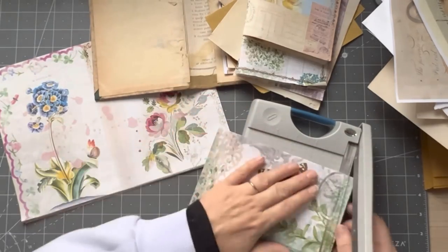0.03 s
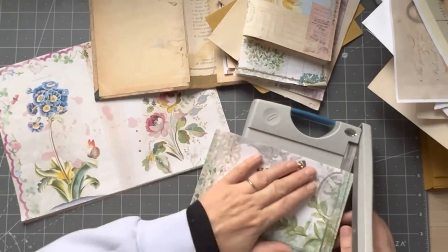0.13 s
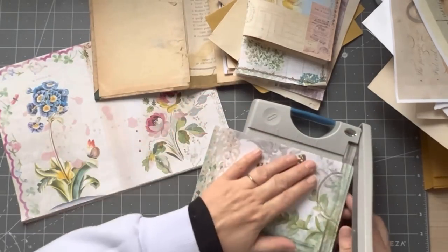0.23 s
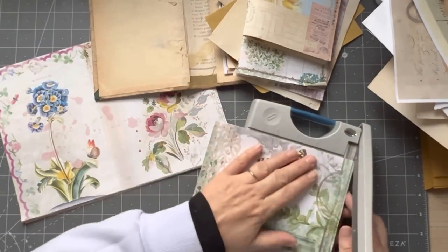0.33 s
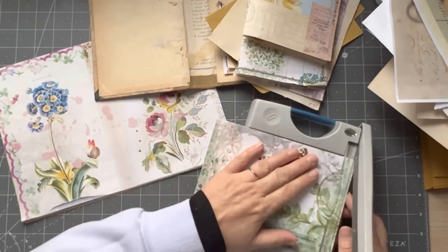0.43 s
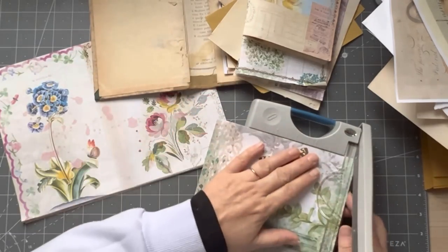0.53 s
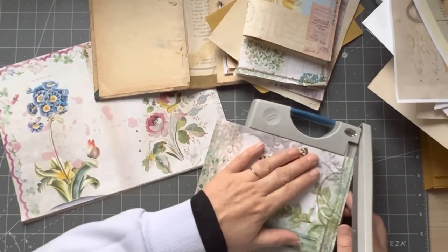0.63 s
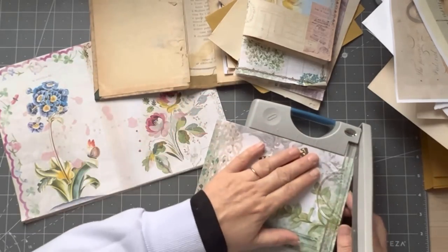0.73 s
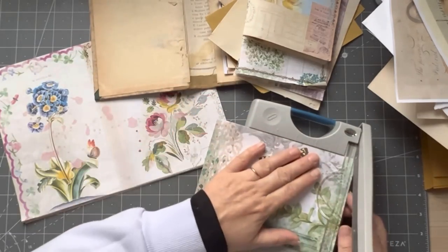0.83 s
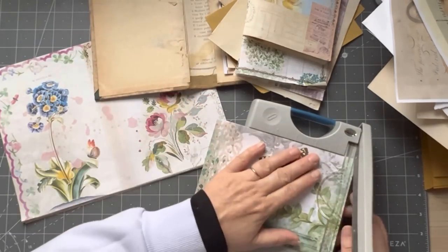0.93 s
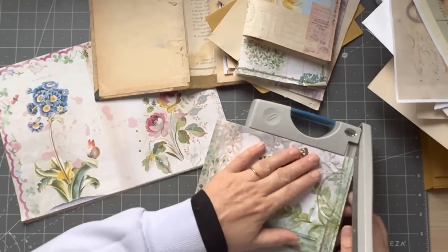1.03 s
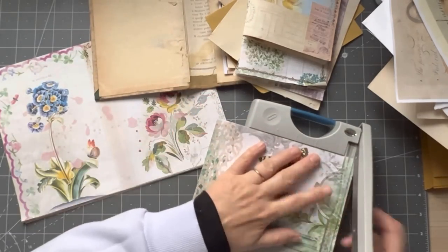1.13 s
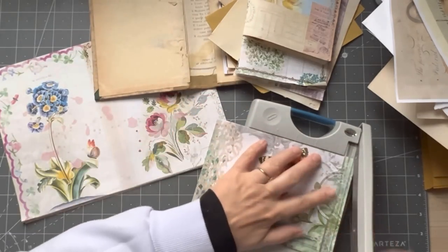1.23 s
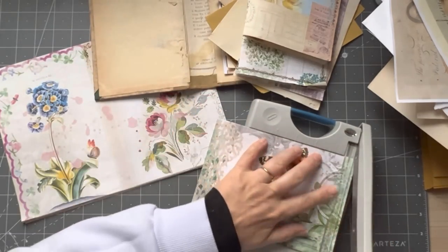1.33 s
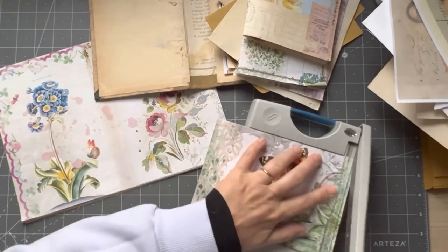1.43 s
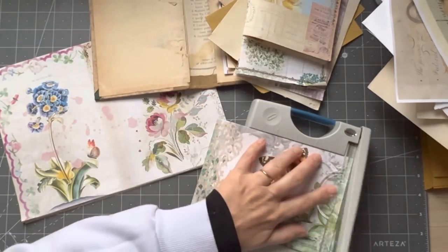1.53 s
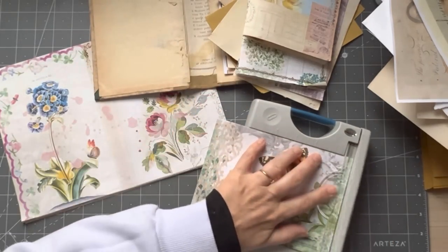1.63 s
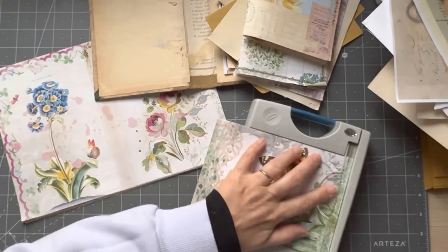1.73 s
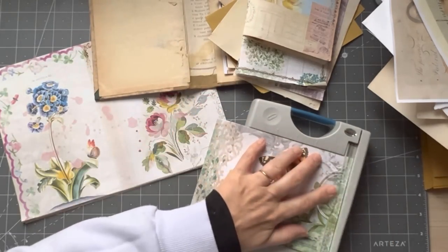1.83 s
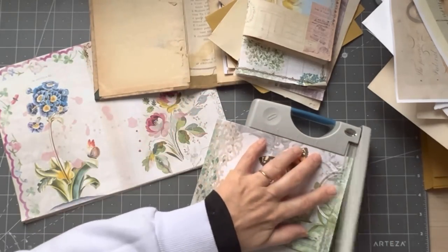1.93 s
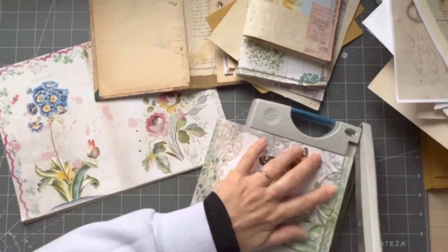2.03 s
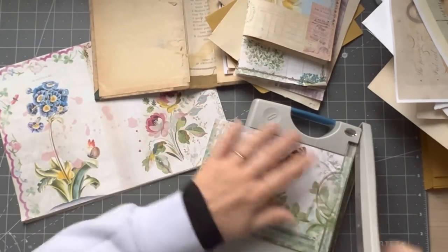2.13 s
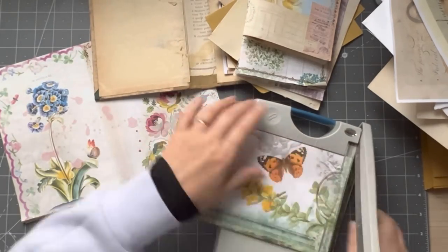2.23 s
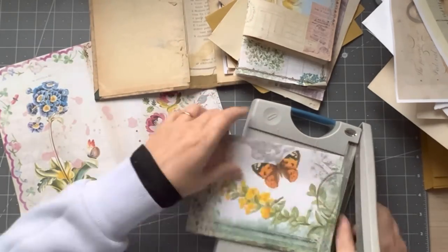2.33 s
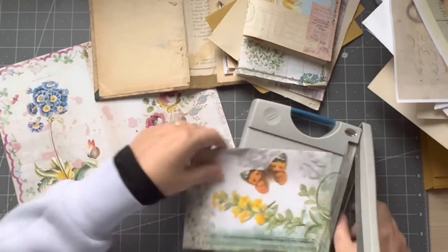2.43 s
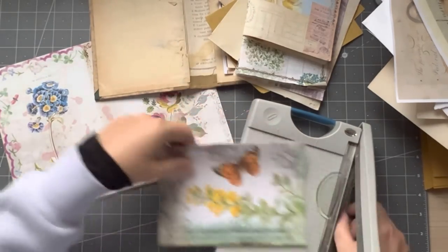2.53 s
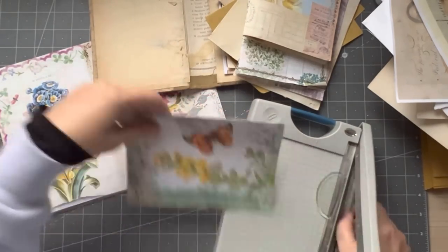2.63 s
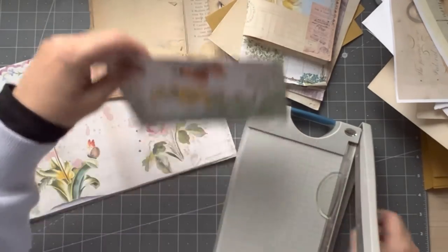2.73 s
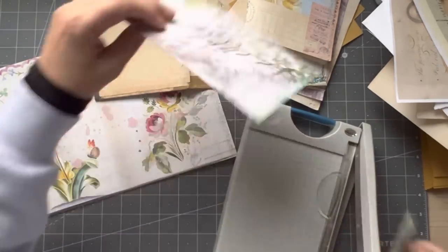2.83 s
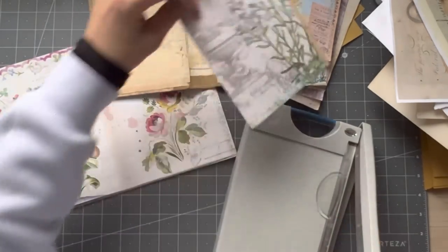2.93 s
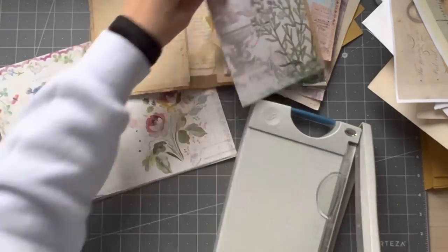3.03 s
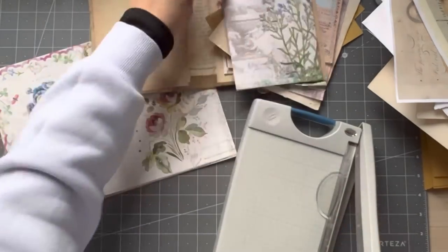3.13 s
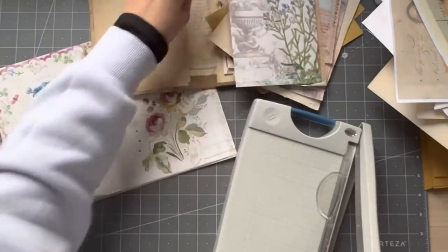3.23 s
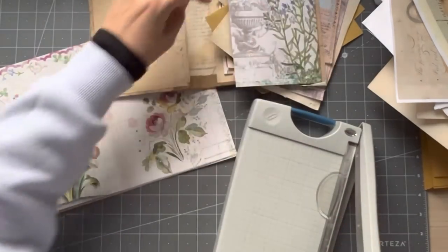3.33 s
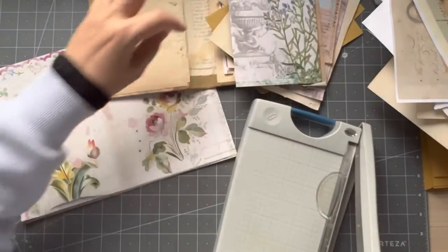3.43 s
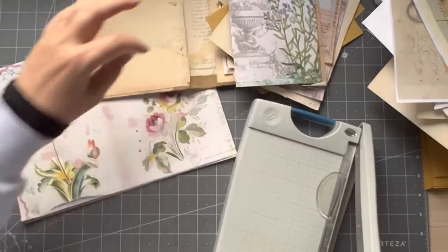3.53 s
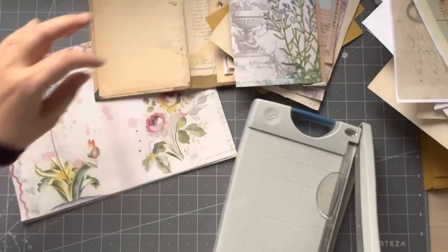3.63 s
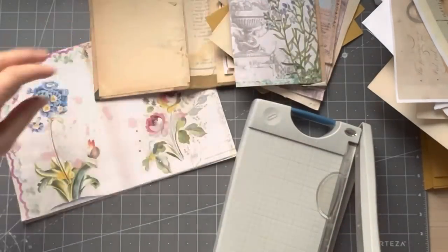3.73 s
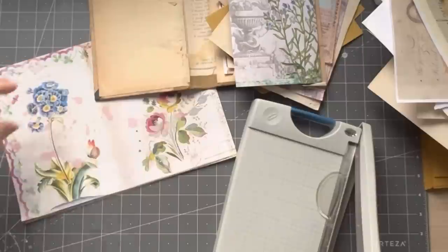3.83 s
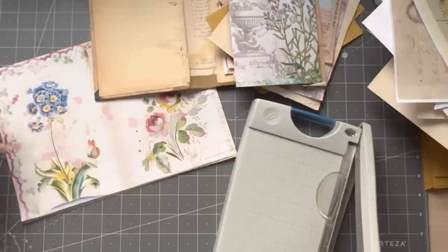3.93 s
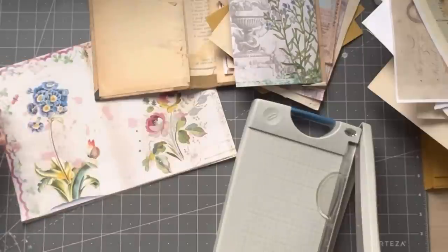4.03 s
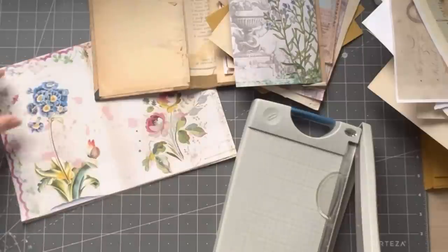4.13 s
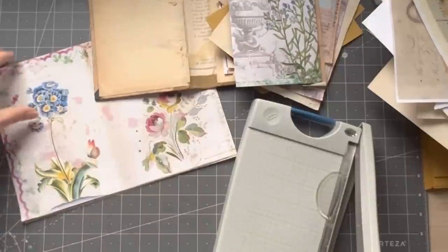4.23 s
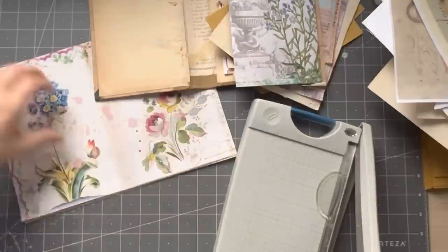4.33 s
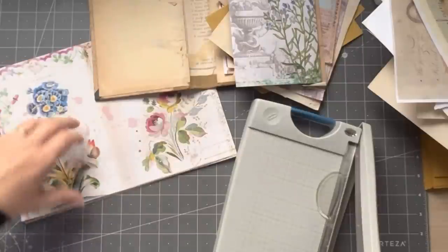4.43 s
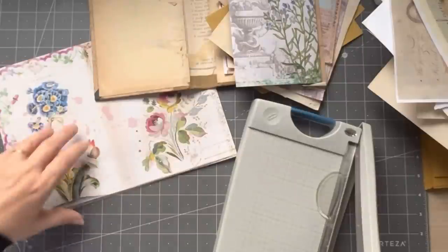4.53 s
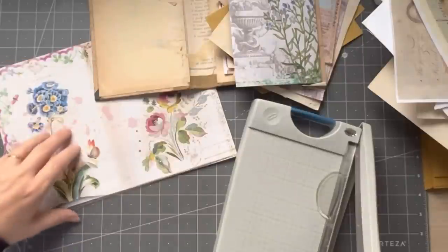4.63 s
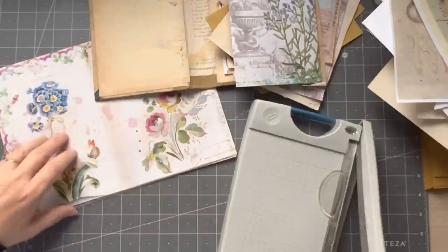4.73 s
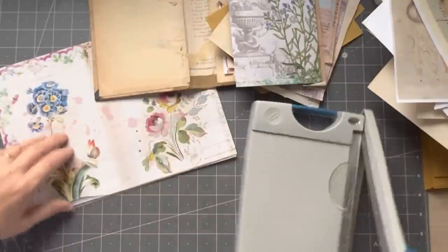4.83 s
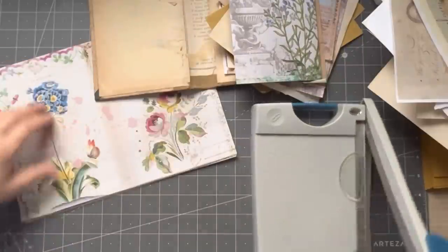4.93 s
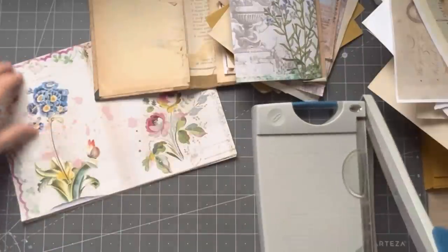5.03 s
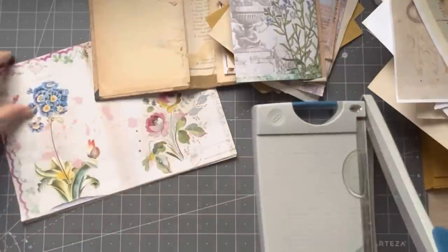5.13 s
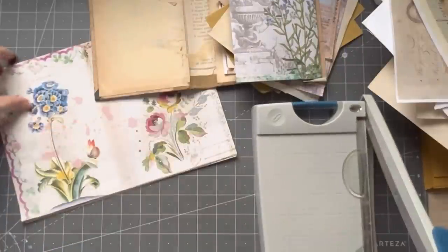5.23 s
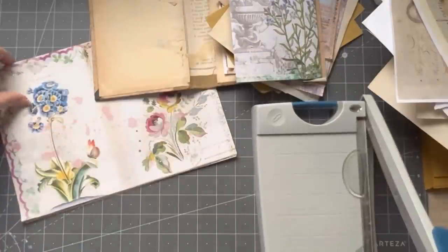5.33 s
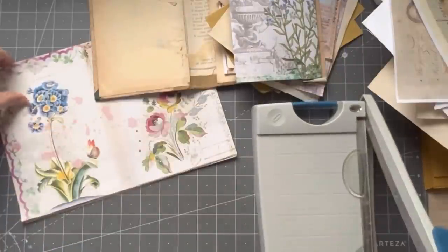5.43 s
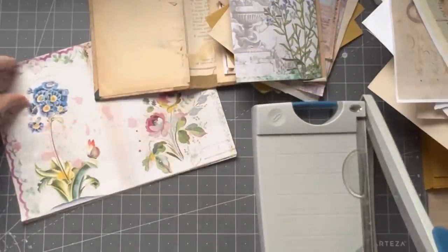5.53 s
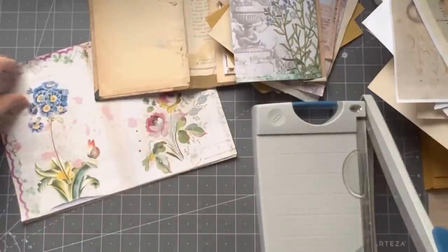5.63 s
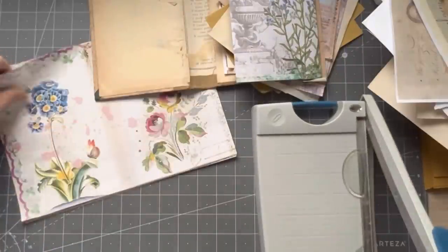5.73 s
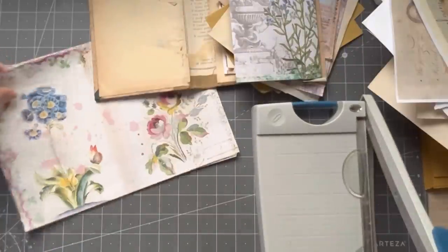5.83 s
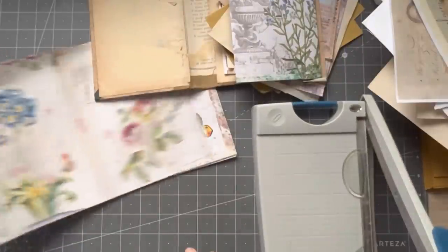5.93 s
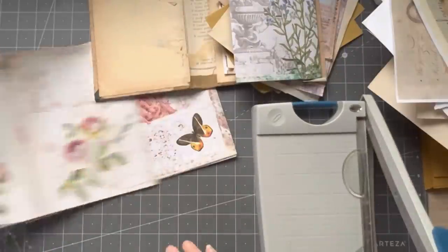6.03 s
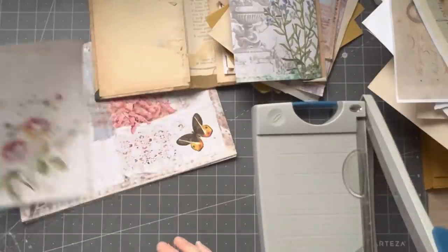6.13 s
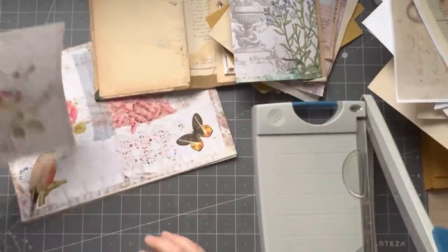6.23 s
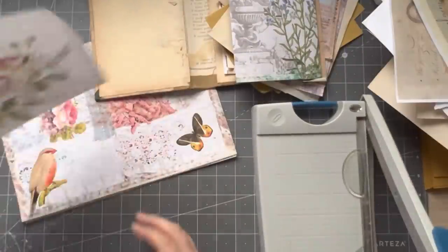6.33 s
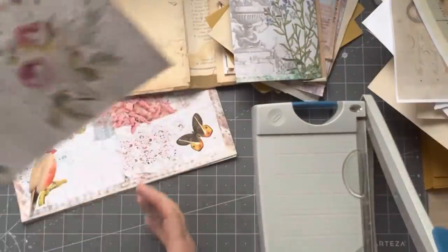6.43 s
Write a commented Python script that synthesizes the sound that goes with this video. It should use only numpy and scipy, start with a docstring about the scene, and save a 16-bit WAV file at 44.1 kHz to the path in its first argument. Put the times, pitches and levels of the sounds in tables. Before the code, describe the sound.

Paper hisses onto a plastic trimmer, the blade shears down and clacks shut, squeaks back up, and sheets rustle as a page turns.

```python
"""A sheet hisses and taps as it is squared up on a hollow plastic paper trimmer. The blade arm
shears down in stick-slip, slams shut on the ringing base and swings up on a squeaking pivot.
The sheet is lifted away, the trimmer is dragged over the mat and a large page is turned, amid
small ticks and snaps. Two close microphones in a small quiet room with a low rumble."""
import sys
import numpy as np
from scipy import signal
from scipy.fft import rfft, irfft
from scipy.io import wavfile
from scipy.ndimage import uniform_filter1d

SR = 44100
rng = np.random.default_rng(int(sys.argv[2]) if len(sys.argv) > 2 else 0)


def waveform_to_disk(signal):
    """Save audio, clipped to [-1, 1], as 16-bit WAV at the path in sys.argv[1]."""
    frames = np.transpose(np.atleast_2d(signal))
    scaled = np.clip(frames, -1, 1) * 32767
    samples = np.round(scaled).astype(np.int16)
    wavfile.write(sys.argv[1], SR, samples)


N = 285238


def amp(db):
    """dB to gain."""
    return 10 ** (np.asarray(db) / 20)


def unit_rms(x):
    """Scale to rms 1."""
    return x / np.sqrt(np.mean(x ** 2) + 1e-20)


def curves(tables):
    """Columns over time, and a gate open while a table lasts."""
    t = np.arange(N) / SR
    times_s, *columns = np.transpose(np.vstack(tables))
    gate = sum((t >= rows[0][0]) * (t < rows[-1][0]) for rows in tables)
    return [np.interp(t, times_s, c) for c in columns], uniform_filter1d(gate * 1., size=200)


def on_bins(points):
    """A table on the FFT grid, interpolated in log frequency."""
    bin_hz = np.maximum(np.arange(N // 2 + 1) * SR / N, 1)
    hz, values = np.transpose(points)
    return np.interp(np.log(bin_hz), np.log(hz), values)


def colour(x, spectrum):
    """Filter x by a dB curve."""
    return irfft(rfft(x) * amp(on_bins(spectrum)), N)


def drift(rate_hz):
    """Smooth random wander, rms 1."""
    r = np.exp(-2 * np.pi * rate_hz / SR)
    return unit_rms(signal.lfilter([1], [1, -2 * r, r * r], rng.standard_normal(N + SR))[SR:])


def grains(per_s, spread_db, clump_db):
    """Fibres catch and let go: uneven clicks in clumps."""
    sizes = amp(spread_db * np.minimum(rng.exponential(1, N), 5)) * rng.choice([-1, 1], N)
    fires = rng.random(N) < per_s / SR
    return sizes * fires * amp(clump_db * (drift(36) + drift(210)))


def patchy(x, patch_db):
    """A bending sheet or blade favours ever-changing patches of pitch; rms 1."""
    _, _, spectra = signal.stft(x, nperseg=512)
    patches = uniform_filter1d(rng.standard_normal(spectra.shape), size=4, axis=0)
    patches = unit_rms(uniform_filter1d(patches, size=6, axis=1))
    _, out = signal.istft(spectra * amp(patch_db * patches), nperseg=512)
    return unit_rms(out[:N])


def ring(x, modes):
    """x drives a body's modes, signs alternating."""
    out = 0
    for k, (hz, db, t60_s) in enumerate(modes):
        r, w = amp(-60 / (t60_s * SR)), 2 * np.pi * hz / SR
        mode = signal.lfilter([0, amp(db) * np.sin(w)], [1, -2 * r * np.cos(w), r * r], x + 1e-18)
        out = out + (-1) ** k * mode
    return out


def resonance(hz, width_hz):
    """Coefficients of one unity-gain peak."""
    r = np.exp(-np.pi * width_hz / SR)
    return (1 - r * r) / 2 * np.array([1, 0, -1]), [1, -2 * r * np.cos(2 * np.pi * hz / SR), r * r]


def moving_peak(x, hz, width_hz):
    """x through a resonance of moving centre and width; rms 1."""
    out, state = np.zeros(N), np.zeros(2)
    for i in range(0, N, 256):
        b, a = resonance(hz[i], width_hz[i])
        out[i:i + 256], state = signal.lfilter(b / np.sqrt(width_hz[i]), a, x[i:i + 256], zi=state)
    return unit_rms(out)


def add(out, start_s, sound):
    """Mix a short sound in."""
    i = round(start_s * SR)
    out[i:i + len(sound)] += sound[:N - i]


# Sheet hiss per move (square up, press, lift, carry off, turn page): t/s, level/dB
SHEET_MOVES = [
    [(0.0, -64.5), (0.034, -50.5), (0.072, -59.5), (0.246, -54), (0.297, -55.5), (0.302, -68), (0.344, -66),
     (0.484, -69.5), (0.56, -96)],
    [(1.06, -80.5), (1.166, -58), (1.176, -47), (1.2, -63), (1.288, -63.5), (1.296, -59), (1.342, -71),
     (1.386, -82), (1.39, -78)],
    [(2.27, -72.5), (2.288, -44.5), (2.368, -60), (2.386, -50.5), (2.502, -53.5), (2.588, -47.5),
     (2.614, -53.5), (2.644, -46.5), (2.69, -65.5)],
    [(2.69, -68), (2.698, -75), (2.764, -50), (2.792, -62.5), (3.022, -64.5), (3.076, -53.5),
     (3.114, -63.5), (3.146, -51.5), (3.24, -97)],
    [(5.65, -65), (5.674, -50), (5.732, -60), (5.78, -50), (6.1, -42), (6.13, -51), (6.338, -76),
     (6.398, -56.5), (6.46, -61)],
]
# Sheet hiss spectrum: f/Hz, level/dB
SHEET_SPECTRUM = [(150, -2), (380, -4.5), (800, -8.5), (2000, -8.5), (4000, -6), (7000, -5), (9000, -4),
                  (10300, -15), (12300, -3.5), (16000, -11.5)]
# Brief tones of the sheet and a low hollow ring of the trimmer base: t/s, length/s, level/dB, f/Hz
BRIEF_TONES = [(0.055, 0.15, -61, 1110), (0.168, 0.14, -64, 388), (2.269, 0.18, -55.5, 1160),
               (2.284, 0.087, -48, 342), (2.365, 0.23, -57.5, 1400), (2.559, 0.13, -49, 1180),
               (2.696, 0.062, -50.5, 2940), (2.81, 0.038, -60, 1407), (3.045, 0.046, -60, 1220),
               (5.661, 0.074, -59, 1870), (5.743, 0.56, -53, 1830), (6.032, 0.16, -57.5, 1140)]


def paper_handling():
    """Sliding sheets hiss; brief sheet tones and a low hollow ring of the base swell and fade."""
    (hiss_db,), gate = curves(SHEET_MOVES)
    friction = colour(grains(7000, spread_db=3, clump_db=1.5), SHEET_SPECTRUM)
    out = gate * amp(hiss_db) * patchy(friction, patch_db=2.5)
    fibres = grains(12000, spread_db=1.5, clump_db=.8)
    for start_s, length_s, db, hz in BRIEF_TONES:
        progress = np.linspace(0, 1, round(length_s * SR))
        swell = np.sin(np.pi * progress ** .54)  # peaks early
        width_hz = max(210 * (hz / 1200) ** 3.5, 45)
        drive = fibres[round(start_s * SR):][:len(swell)]
        tone = unit_rms(signal.lfilter(*resonance(hz, width_hz), drive))
        add(out, start_s, amp(db) * swell * tone)
    return out


# Rumble spectrum: f/Hz, level/dB
RUMBLE_SPECTRUM = [(12, -59.5), (20, -27.5), (35, -10), (59, -4.5), (73, -8), (96, -19.5), (144, -20),
                   (166, -25), (736, -47.5), (3000, -55), (3900, -94), (6600, -120)]
# Rumble left-right likeness: f/Hz, coherence/1
RUMBLE_COHERENCE = [(50, 1), (150, 0.5), (400, 0.93), (2000, 0.28), (9000, 0.41)]


def rumble(rest_db=-57, shake_db=-28, smooth_s=.08):
    """Building rumble, alike on both sides in the bass; swells as rubbing shakes the desk."""
    (_, load_db), gate = curves(RUB_STROKES)
    shake = uniform_filter1d(gate * amp(shake_db + load_db), size=round(smooth_s * SR))
    mid, side = rfft(rng.standard_normal((2, N))) * amp(on_bins(RUMBLE_SPECTRUM))
    coherence = np.clip(on_bins(RUMBLE_COHERENCE), 0, 1)
    stereo = irfft(np.sqrt(1 + coherence) * mid + np.sqrt(1 - coherence) * side * [[1], [-1]], N)
    return np.hypot(amp(rest_db), shake) * amp(1.5 * drift(6)) * unit_rms(stereo)


# Blows on trimmer or desk: t/s, relative crack level/dB, relative thump level/dB, crack t60/s, f/Hz
BLOWS = [(0.031, -27.5, -47, 0.035, 1470), (1.175, -26, -52, 0.03, 975), (1.342, -38.5, -64, 0.14, 88),
         (1.544, -21, -35, .04, 1080), (1.617, -42, -24.5, .03, 140), (1.661, -5.5, -50, 0.035, 5180),
         (1.6637, -4.5, -55, 0.03, 2964), (1.665, -1.5, -20.5, 0.03, 1520), (1.668, -16, -25, .05, 503),
         (1.672, -16, -13, 0.063, 330), (1.703, -26, -20, .05, 88.6), (1.8485, -15, -42.5, 0.019, 5260),
         (1.851, -10, -25, 0.032, 300), (1.856, -15, -42.5, 0.024, 5560), (2.236, -48, -51.5, 0.038, 4740),
         (2.242, -39.5, -43, 0.066, 1026), (3.782, -36.5, -66, 0.04, 1302),
         (3.7885, -33, -68.5, 0.032, 1380), (3.791, -36.5, -65, 0.15, 678),
         (3.806, -36.5, -57.5, 0.081, 3445), (4.757, -58, -44, 0.05, 100), (4.923, -35, -59, 0.029, 1300),
         (4.926, -28.5, -49, 0.12, 420), (4.936, -25, -68, 0.057, 485), (4.955, -43, -50, 0.041, 514),
         (5.213, -48, -49, 0.021, 1516), (5.222, -58, -40, .05, 59.4), (6.098, -34, -47.5, 0.043, 856),
         (6.271, -44.5, -42, 0.26, 700)]
# Rattle spectrum: f/Hz, level/dB
RATTLE_SPECTRUM = [(300, 2), (800, 0), (1600, -3), (3000, -7), (5500, -8), (9000, -8.5), (12200, -9),
                   (16000, -15)]
# Modes of the hollow base on the desk: f/Hz, level/dB, t60/s
BASE_MODES = [(69, -8, 0.2), (92, -2, 0.125), (150, 1, 0.06), (252, -3, 0.085), (315, -11, .07),
              (345, -8, 0.042), (440, -9, 0.055), (503, -6.5, 0.06), (660, -5, 0.03)]


def knocks(hollow_hz=999, width_ratio=.16, min_push_s=.00077, push_cycles=.27):
    """Each blow cracks and rattles, hollower at low pitch; the base thumps just after."""
    cracks, pushes, t = np.zeros(N), np.zeros(N), np.arange(SR // 4) / SR
    rattles = unit_rms(colour(grains(9000, spread_db=2.5, clump_db=.5), RATTLE_SPECTRUM))
    attack = 1 - np.exp(-t / .0004)
    for k, (start_s, crack_db, thump_db, t60_s, hz) in enumerate(BLOWS):
        rattle = np.roll(rattles, -k * len(t))[:len(t)]
        band = signal.butter(2, [hz / 3, min(3.4 * hz, 15000)], "band", fs=SR)
        broad = unit_rms(signal.lfilter(*band, rattle))
        hollow = unit_rms(signal.lfilter(*resonance(hz, width_ratio * hz), rattle))
        crack = broad + (.5 + hollow_hz / hz) * hollow + amp(-14) * rattle
        crack /= crack[:300].std()
        cavity_tone = amp(1.5) * np.sin(2 * np.pi * hz * t) * np.exp(-width_ratio * hz * t)
        strike = amp(-60 * t / t60_s) * (crack + cavity_tone)
        tail = amp(-28 - 60 * t / .073) * broad
        add(cracks, start_s, amp(crack_db - 8) * (strike + tail) * attack)
        push_s = max(min_push_s, push_cycles / hz)  # dull blows push longer
        push = np.hanning(round(push_s * SR))
        add(pushes, start_s + .002, amp(thump_db + 2.5) * push / push.sum())
    return cracks + ring(pushes, BASE_MODES)


# Small ticks, taps and snaps of paper and trimmer: t/s, relative level/dB, f/Hz
SMALL_TICKS = [(0.2994, -28, 8600), (0.4708, -46, 2720), (0.716, -49, 3100), (1.1684, -38, 1370),
               (1.294, -34, 2920), (1.307, -32, 2680), (1.332, -30.5, 2740), (1.883, -22, 4930),
               (1.988, -28, 8420), (2.2885, -26.5, 4600), (2.386, -33, 4740), (2.471, -37, 1500),
               (2.628, -27, 1280), (2.7, -27.5, 2540), (2.759, -29, 4160), (2.8205, -37, 896),
               (2.829, -34.5, 1400), (3.043, -56.5, 3000), (3.069, -39, 7160), (3.1485, -39.5, 5543),
               (3.781, -36, 12260), (3.792, -40, 6540), (3.8057, -33, 8670), (5.2056, -30.5, 7150),
               (5.289, -37.5, 4010), (5.4796, -43, 2820), (5.5495, -45.5, 2720), (5.5688, -40.5, 7400),
               (5.669, -30.5, 8340), (5.7513, -39, 1850), (5.7802, -29.5, 1720), (5.857, -30.5, 1770),
               (5.866, -32, 1510), (5.944, -27, 2330), (5.949, -27.5, 2440), (5.953, -31.5, 1340)]


def small_ticks(ref_t60_s=.037, ref_db=-31, click_db=-10.5, click_cycles=25):
    """Paper and trimmer tick: a ringing click and a noise burst; faint ones are softer and longer."""
    out, t = np.zeros(N), np.arange(SR // 5) / SR
    for start_s, db, hz in SMALL_TICKS:
        t60_s = ref_t60_s * amp(.19 * (ref_db - db))
        noise = rng.standard_normal(len(t))
        burst = .52 * noise + 2.9 * signal.lfilter(*resonance(hz, width_hz=600), noise)
        envelope = amp(-60 * t / t60_s) * (1 - np.exp(-t / (.07 * t60_s)))
        click = amp(click_db - 60 * t * hz / click_cycles) * np.sin(2 * np.pi * hz * t)
        add(out, start_s, amp(db - 9) * burst * envelope + amp(db) * ref_t60_s / t60_s * click)
    return out


# Friction per stroke (blade down, blade up, base dragged, base dragged on): t/s, hiss/dB, body load/dB
RUB_STROKES = [
    [(1.392, -58, -51.5), (1.404, -53.5, -52.5), (1.478, -40, -38.5), (1.484, -43.5, -37.5),
     (1.539, -32, -29.5), (1.55, -27.5, -24), (1.578, -42, -33.5), (1.608, -32.5, -29.5), (1.618, -30, -34),
     (1.624, -28, -24), (1.634, -28.5, -27.5), (1.642, -27, -59), (1.66, -44, -54)],
    [(1.881, -49.5, -60), (1.886, -26.5, -60), (1.9, -24.5, -26), (1.928, -28, -36.5), (1.944, -39.5, -49),
     (1.984, -42.5, -45), (2.012, -44, -82), (2.048, -38.5, -48.5), (2.112, -76.5, -78),
     (2.18, -88.5, -72.5), (2.236, -86, -63.5)],
    [(4.55, -90.5, -80), (4.604, -79.5, -79.5), (4.66, -78, -67), (4.782, -57.5, -46.5),
     (4.796, -54.5, -46), (4.832, -51, -42), (4.918, -54, -43.5), (4.924, -54.5, -41),
     (5.014, -61.5, -90.5), (5.074, -69, -81), (5.1, -75.5, -82.5)],
    [(5.1, -80, -83.5), (5.114, -83, -64), (5.134, -74.5, -53.5), (5.165, -67, -52.5), (5.19, -72.5, -52),
     (5.199, -56.5, -59), (5.217, -62, -59.5), (5.254, -92, -61), (5.274, -78, -47), (5.296, -64.5, -52.5),
     (5.37, -83.5, -86), (5.388, -102, -96.5), (5.4, -90, -84)],
]
# Mix per stroke, re load: arm ring/dB, blade tone/dB, base rumble/dB, blade resonance width/Hz
STROKE_MIX = [(-2.5, -1.5, 0, 280), (-11.5, -0.46, -18.5, 350), (-13.5, -0.5, -4, 990), (-9, -2.5, -3, 900)]
# Free blade pitch per stroke, moving with the overhang: t/s, f/Hz
BLADE_PITCH = [
    [(1.392, 1830), (1.475, 1930), (1.5, 1780), (1.53, 1780), (1.545, 1290), (1.556, 1050), (1.605, 1120),
     (1.628, 1430), (1.656, 1630)],
    [(1.878, 3000), (1.888, 2240), (1.902, 1190), (1.92, 1490), (1.95, 1460), (2.07, 1240), (2.236, 1500)],
    [(4.55, 1000), (4.82, 950), (4.85, 1115), (5.1, 1496)],
    [(5.1, 1000), (5.135, 1700), (5.17, 1000), (5.2, 1300), (5.26, 800), (5.29, 2050), (5.4, 1200)],
]
# Edge hiss spectrum: f/Hz, level/dB
EDGE_SPECTRUM = [(300, 0), (1000, -12.5), (2500, -3.5), (4000, -4.5), (6000, -4.5), (9000, -5.5),
                 (10300, -18), (12200, -5), (16000, -15.5)]
# Blade arm modes: f/Hz, level/dB, t60/s
ARM_MODES = [(1080, 0, .05), (1205, -4, .04), (1345, -2, .04), (1450, -4, .04), (1680, -5, .035),
             (1970, -7, .03), (2740, -10, .03)]


def rubbing():
    """Stick-slip along the blade or under the feet shakes the arm and the hollow base."""
    (hiss_db, load_db), gate = curves(RUB_STROKES)
    held_mix = [[(rows[0][0], *mix), (rows[-1][0], *mix)] for rows, mix in zip(RUB_STROKES, STROKE_MIX)]
    (arm_db, blade_db, base_db, width_hz), _ = curves(held_mix)
    (blade_hz,), _ = curves(BLADE_PITCH)
    slips = grains(5000, spread_db=1.4, clump_db=1.85)
    edge = colour(grains(9000, spread_db=3, clump_db=1.6), EDGE_SPECTRUM)
    hiss = patchy(edge, patch_db=3)
    arm = unit_rms(ring(slips, ARM_MODES))
    blade = moving_peak(moving_peak(slips, blade_hz, width_hz), blade_hz, width_hz)
    # Rubbing at the edge spares the panel modes.
    base = unit_rms(ring(slips, BASE_MODES[5:])) + amp(-13) * unit_rms(ring(slips, BASE_MODES[:3]))
    body = amp(arm_db) * arm + amp(blade_db) * blade + amp(base_db) * base
    return gate * (amp(hiss_db) * hiss + amp(load_db) * body)


# Squeak contour: t/s, f/Hz, level/dB
SQUEAK_CONTOUR = [(1.996, 2710, -48), (2.002, 2655, -29), (2.009, 2497, -27), (2.021, 2360, -21.5),
                  (2.028, 2500, -35.5), (2.045, 2834, -52.5)]
# Squeak harmonics: multiple/1, relative level/dB
SQUEAK_HARMONICS = [(1, -7.5), (2, -12), (3, -16)]


def pivot_squeak():
    """Near-regular slips in the pivot: a rough tone that sags and rises again."""
    (hz, db), gate = curves([SQUEAK_CONTOUR])
    phase = 2 * np.pi * np.cumsum(hz * (1 + .012 * drift(400))) / SR
    tone = sum(amp(harmonic_db) * np.sin(k * phase) for k, harmonic_db in SQUEAK_HARMONICS)
    return gate * amp(db + 2 * drift(270)) * tone


def room_echo(x, low_t60_s=.15, treble_t60_s=.14, late_t60_s=.6):
    """Dense echoes off desk and shelves, unrelated per side; a faint tail from the far walls."""
    t = np.arange(SR // 2) / SR
    noise = rng.standard_normal((2, len(t)))
    low = signal.lfilter(*signal.butter(1, 2500, fs=SR), noise)
    early = low * amp(-60 * t / low_t60_s) + (noise - low) * amp(-60 * t / treble_t60_s)
    early *= 1 - np.exp(-t / .0081)
    late = signal.lfilter(*signal.butter(1, 7000, fs=SR), rng.standard_normal(noise.shape))
    late *= amp(-21 - 60 * t / late_t60_s)
    echoes = signal.lfilter(*signal.butter(3, 200, "high", fs=SR), early + late)
    echoes /= np.sqrt(np.sum(echoes ** 2) / 2)
    return signal.fftconvolve(x[None], echoes, axes=1)[:, :N]


# Microphone port balance: f/Hz, left minus right/dB
PORT_BALANCE = [(60, -.2), (150, 2.5), (300, 0), (600, .5), (1400, -1.5), (2800, -3), (5600, -3.5),
                (9000, 0)]
# Microphone port phase: f/Hz, left lead/rad
PORT_PHASE = [(100, .1), (300, .7), (500, -.3), (1700, -.4), (2600, -1.0), (6500, -.5), (8000, -1.0),
              (8800, 0), (16000, 0)]
# Where the hands work: t/s, left minus right/dB
HAND_PAN = [(0, -2), (1.6, -2.5), (3, -0.5), (4.5, -3), (6.47, 0.5)]


def direct_sound(x):
    """The ports differ in level and phase; bass bends round the housing, the rest pans with the hands."""
    half = amp(on_bins(PORT_BALANCE) / 2) * np.exp(.5j * on_bins(PORT_PHASE))
    stereo = irfft(rfft(x) * np.array([half, 1 / half]), N)
    (pan_db,), _ = curves([HAND_PAN])
    shaded = signal.sosfilt(signal.butter(2, 400, "high", fs=SR, output="sos"), stereo)
    return stereo + (amp(pan_db / 2 * [[1], [-1]]) - 1) * shaded


# Microphone self-noise spectrum: f/Hz, level/dB
MIC_SPECTRUM = [(500, -4.5), (2000, -2), (6000, -4.5), (9000, -4.5), (12500, -5.5), (14000, -21.5)]


def mic_hiss(level_db=-83):
    """Each microphone's own steady noise."""
    return amp(level_db) * unit_rms(colour(rng.standard_normal((2, N)), MIC_SPECTRUM))


def treble_turn(x, from_hz=8800, half_turn_hz=3400, antiphase_db=-5):
    """High treble is mostly shared by both sides, in phase and antiphase by turns up the spectrum."""
    hz, spectrum = np.arange(N // 2 + 1) * SR / N, rfft(x)
    share = .9 * np.clip((hz - from_hz) / 600 + 1, 0, 1)
    blended = share * spectrum.mean(axis=0) + (1 - share) * spectrum
    angle = np.pi * np.maximum(hz - from_hz, 0) / half_turn_hz
    turn = np.cos(angle) + 1j * amp(antiphase_db) * np.sin(angle) * [[1], [-1]]
    return irfft(blended * turn, N)


def scene():
    """Desk sounds, microphone hiss, room echo and rumble."""
    desk = paper_handling() + rubbing() + knocks() + small_ticks() + pivot_squeak()
    return direct_sound(desk) + mic_hiss() + amp(-7) * room_echo(desk) + rumble()


def record(dry):
    """The microphones turn the treble's phase and cut the deep bass and the top."""
    low_cut = signal.butter(3, 45, "high", fs=SR, output="sos")
    top_cut = signal.cheby2(12, 70, 16500, fs=SR, output="sos")
    return signal.sosfilt(top_cut, signal.sosfilt(low_cut, treble_turn(dry)))


dry = scene()
out = record(dry)
waveform_to_disk(out)
```